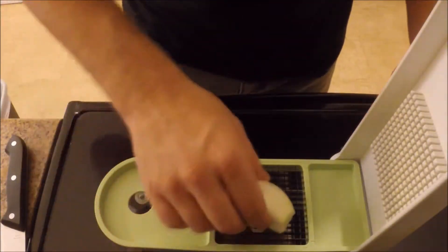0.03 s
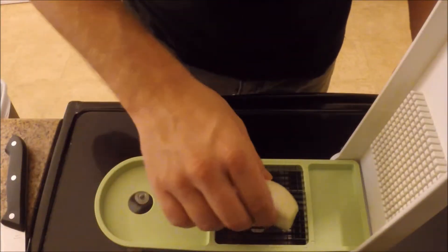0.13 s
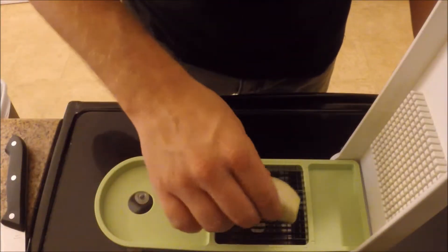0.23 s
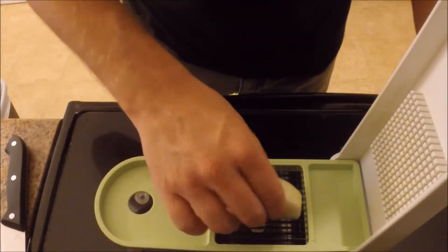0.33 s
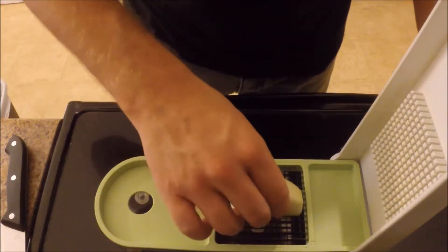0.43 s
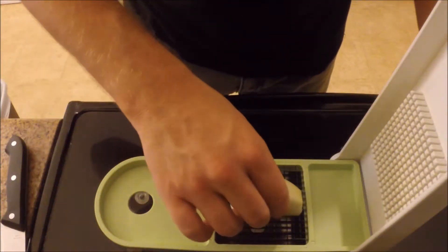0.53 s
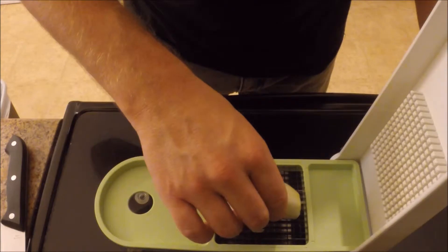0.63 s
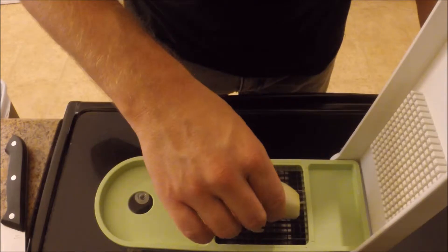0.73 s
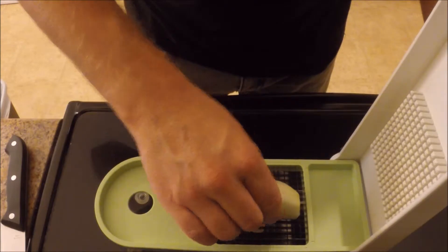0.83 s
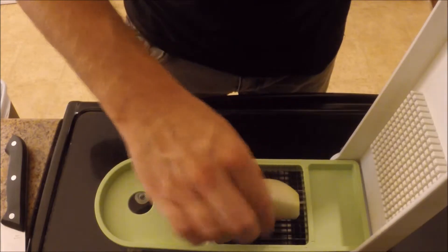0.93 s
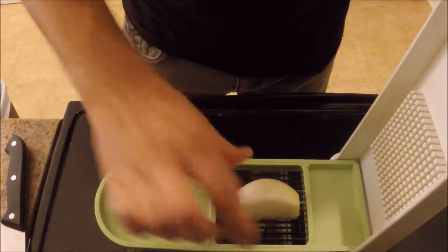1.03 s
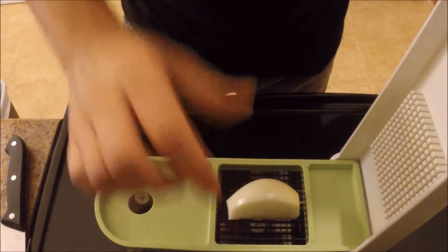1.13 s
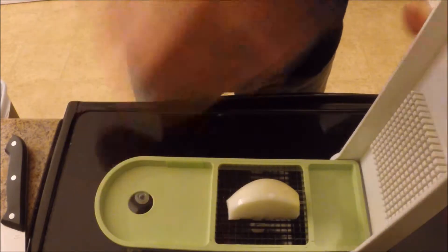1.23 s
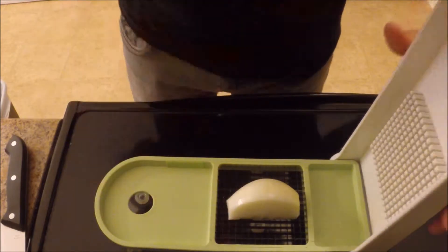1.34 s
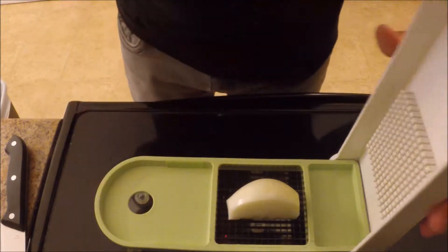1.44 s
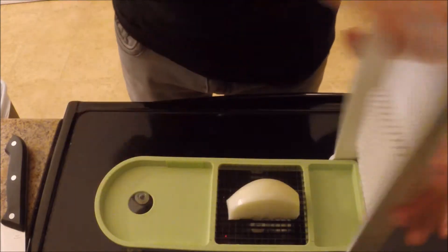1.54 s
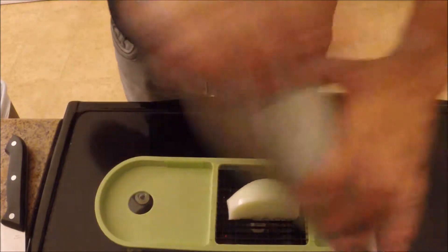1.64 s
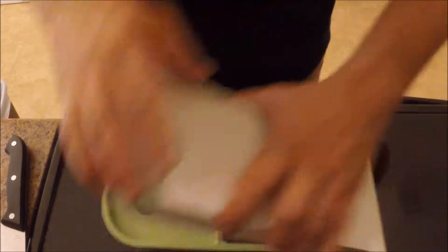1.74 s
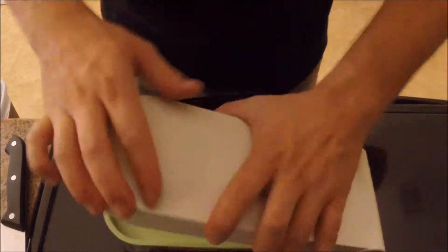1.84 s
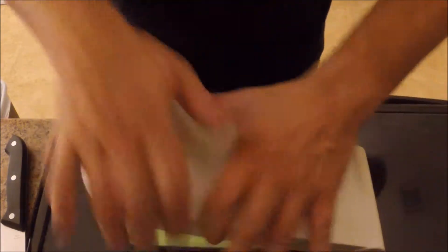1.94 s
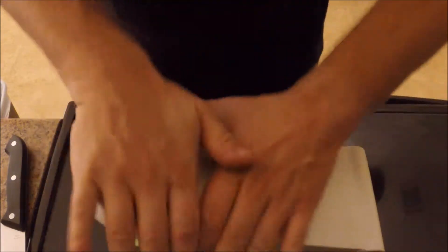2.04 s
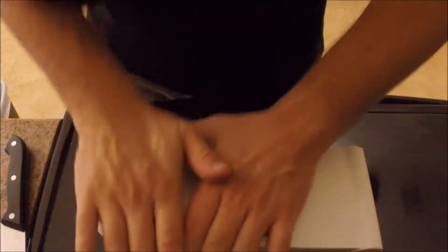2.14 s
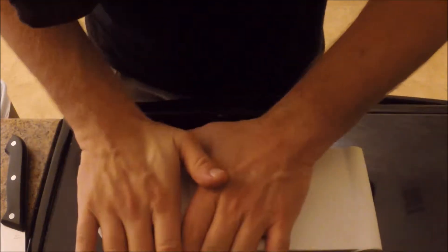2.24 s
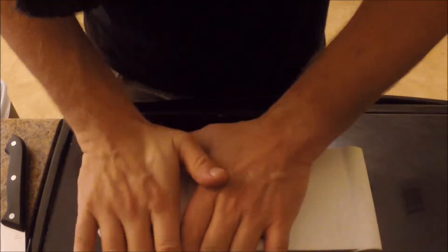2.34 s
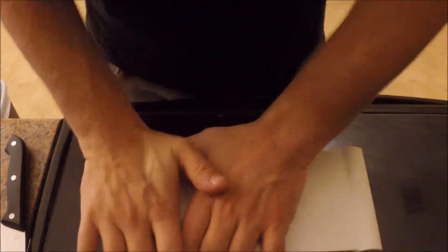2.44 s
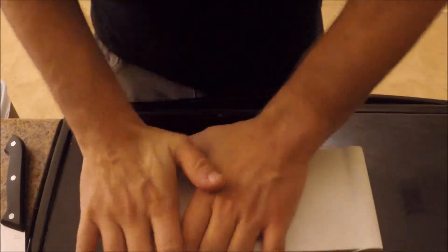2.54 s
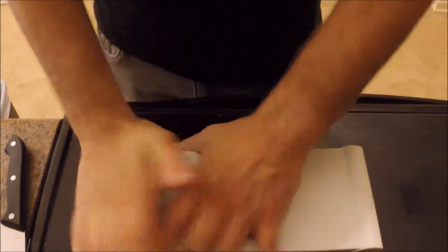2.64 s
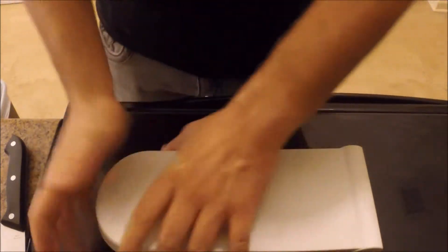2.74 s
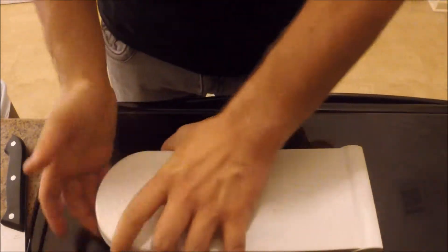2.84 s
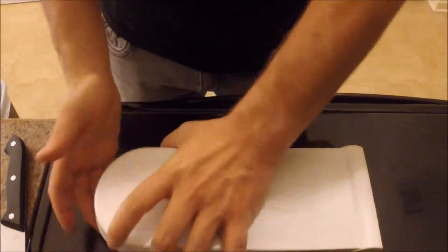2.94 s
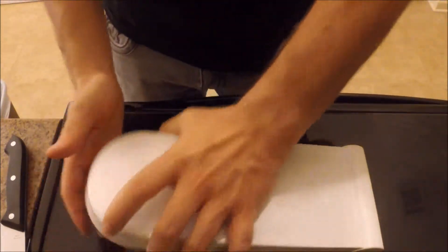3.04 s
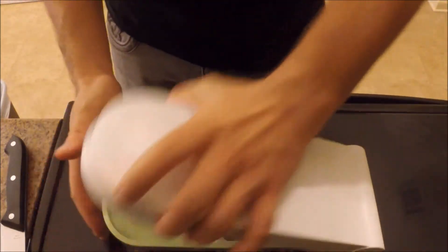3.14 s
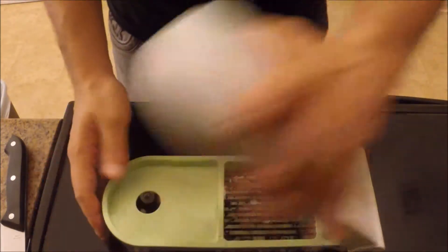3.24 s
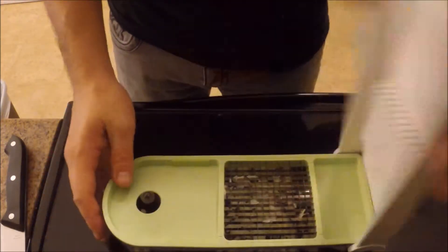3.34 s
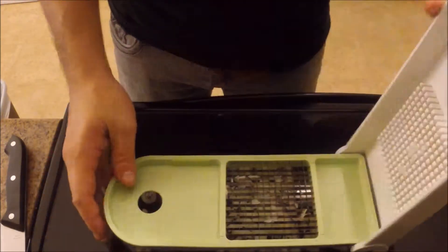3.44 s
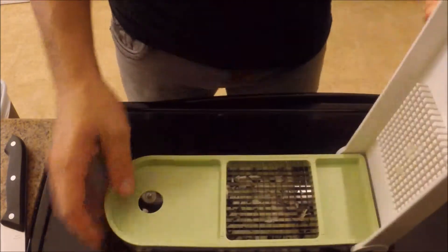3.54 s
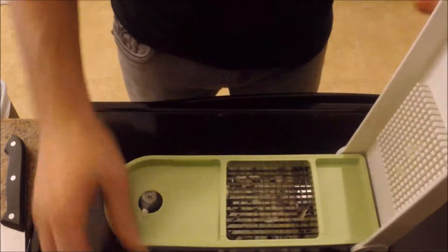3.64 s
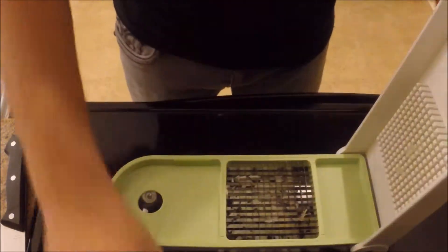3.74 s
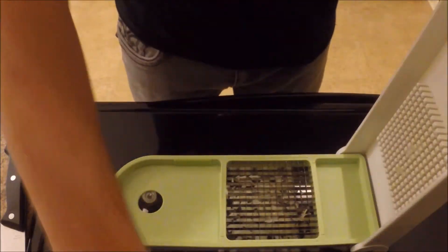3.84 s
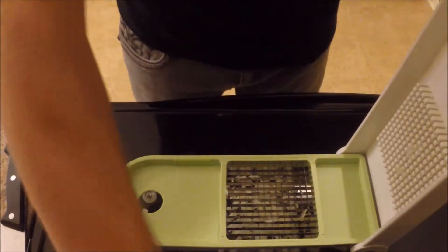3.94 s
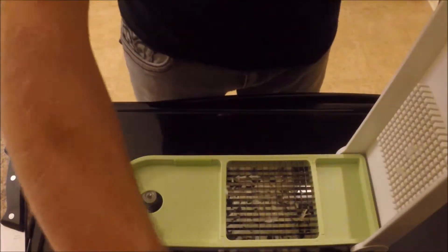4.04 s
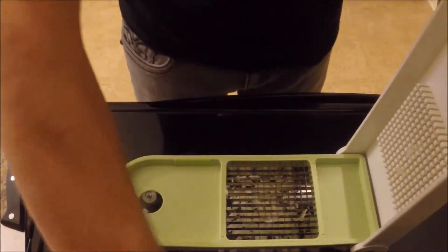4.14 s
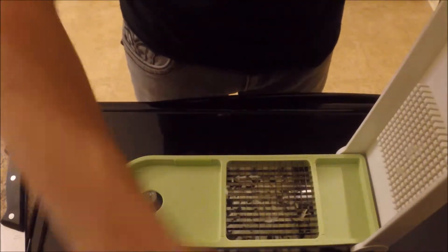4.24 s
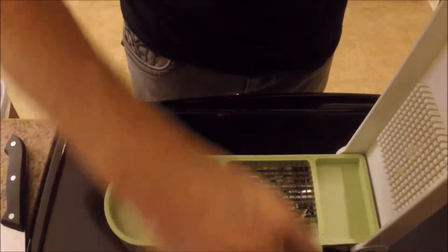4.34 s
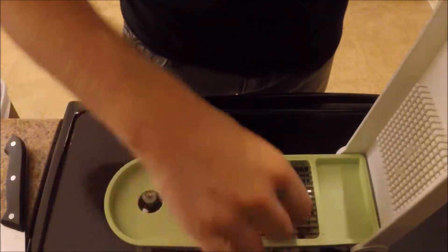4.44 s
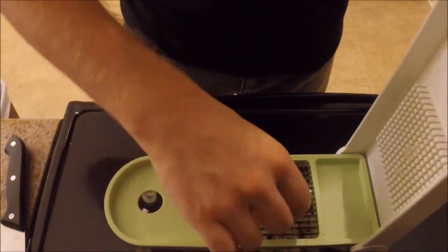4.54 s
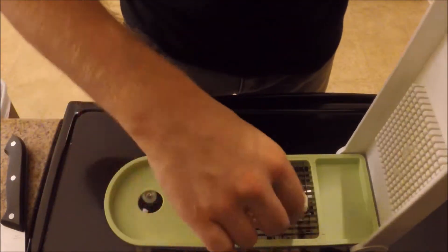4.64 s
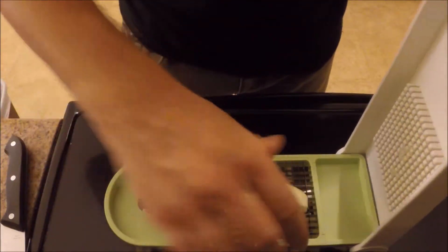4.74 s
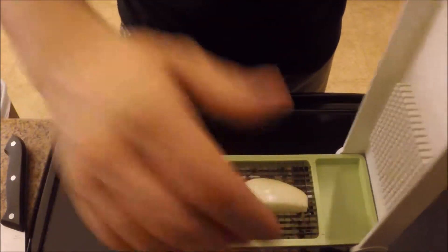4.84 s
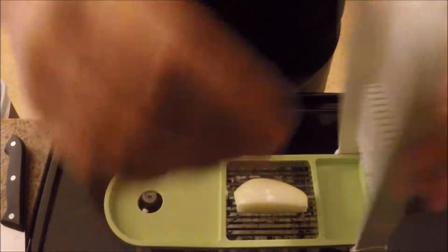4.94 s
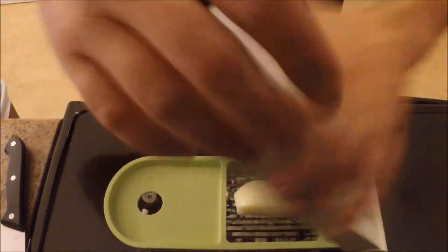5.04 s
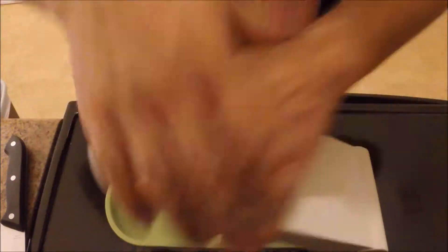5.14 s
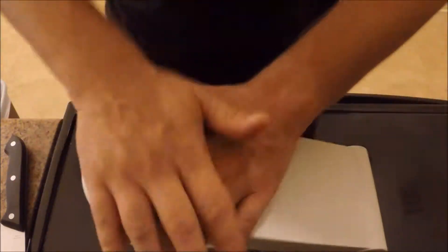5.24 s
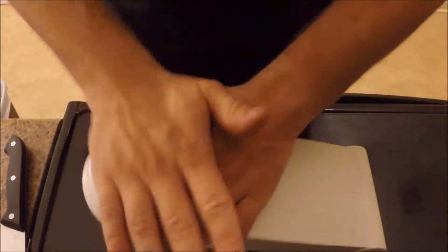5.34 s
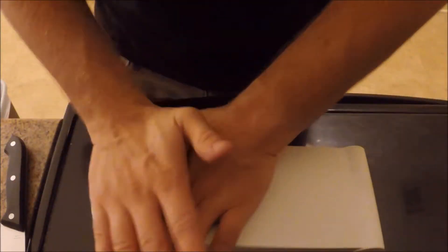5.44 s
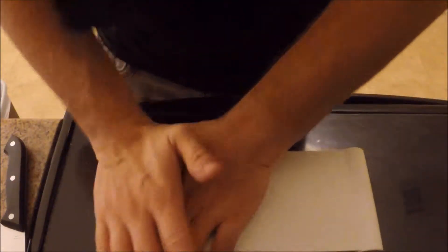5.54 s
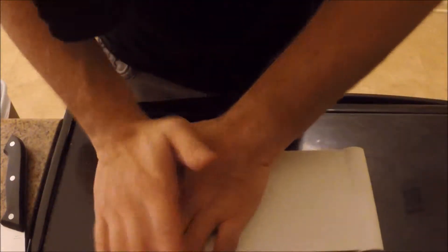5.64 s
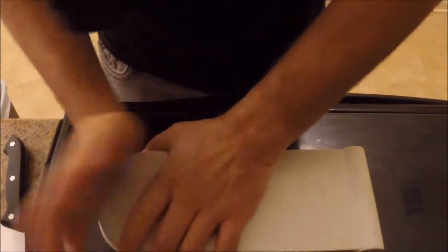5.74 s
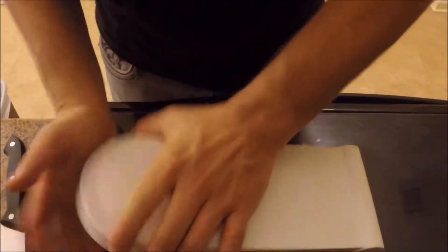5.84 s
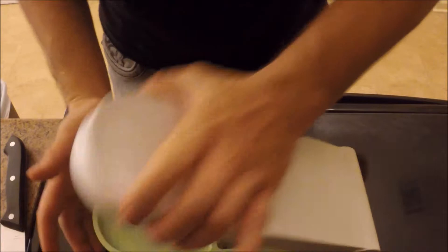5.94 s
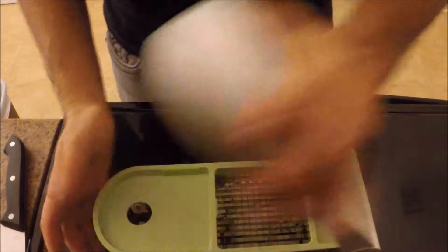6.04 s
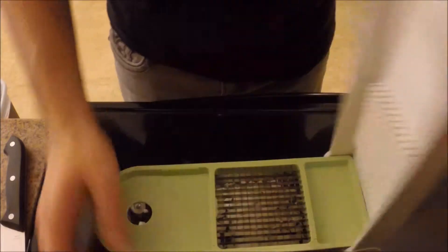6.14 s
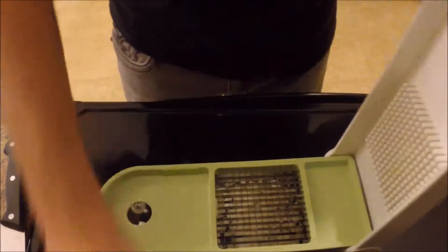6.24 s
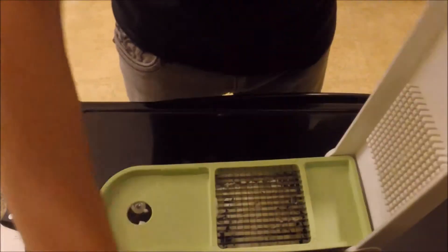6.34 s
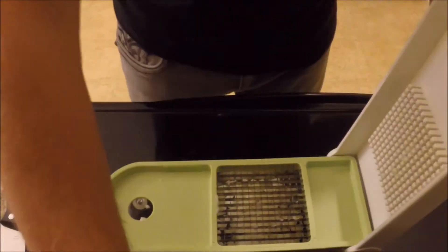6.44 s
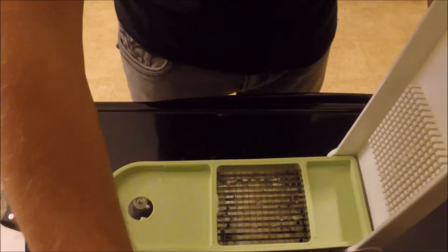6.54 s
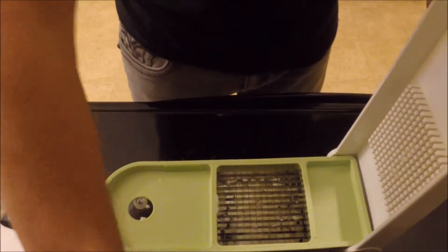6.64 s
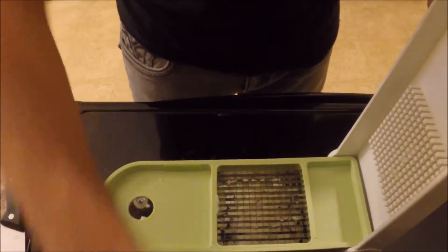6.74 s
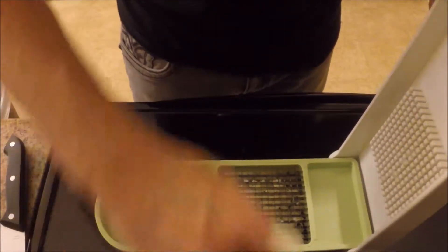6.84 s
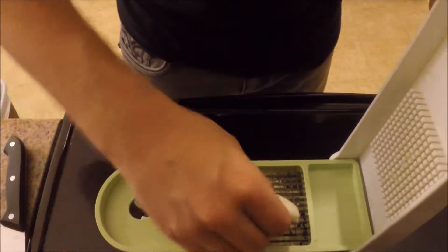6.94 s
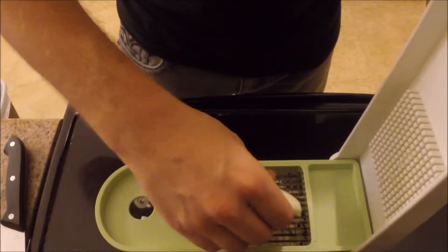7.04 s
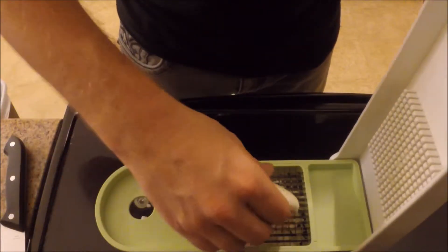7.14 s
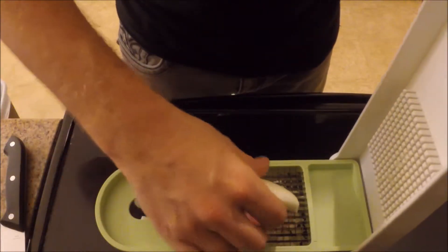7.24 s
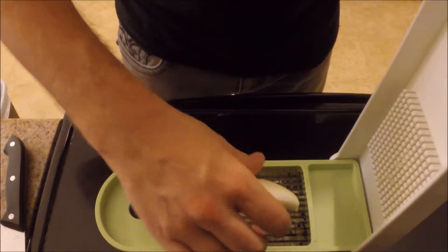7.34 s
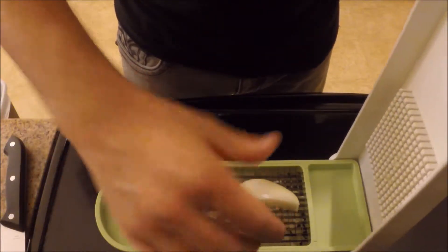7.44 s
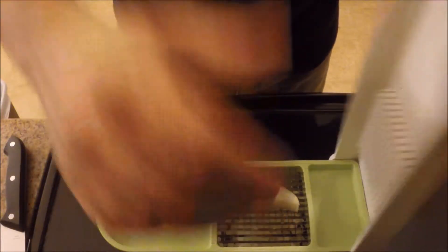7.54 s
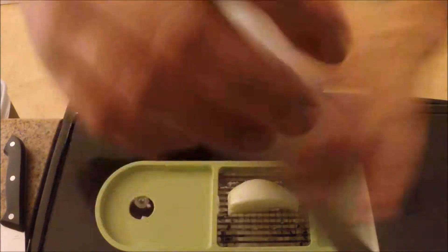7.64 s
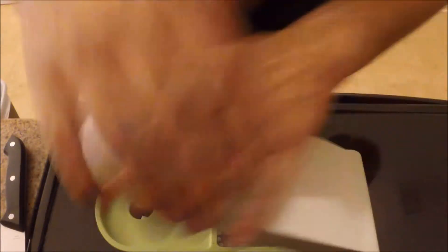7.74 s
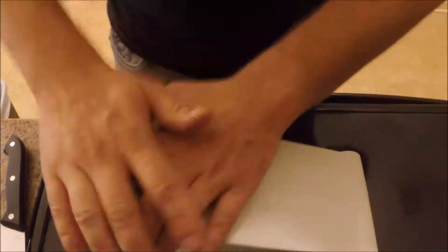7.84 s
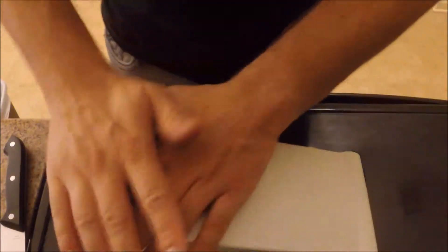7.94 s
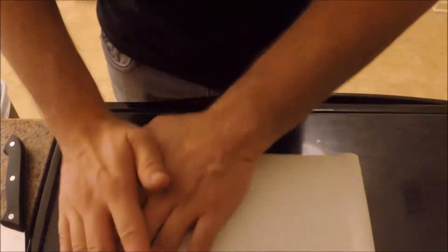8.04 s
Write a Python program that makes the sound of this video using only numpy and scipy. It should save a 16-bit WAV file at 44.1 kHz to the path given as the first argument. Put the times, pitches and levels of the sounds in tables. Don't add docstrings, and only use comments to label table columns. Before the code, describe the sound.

Plastic kitchen chopper taps and clicks, onion crunches through the blades, and the lid slams down hard twice with a low hob boom.

```python
import sys
import numpy as np
from scipy import signal
from scipy.fft import rfft, irfft
from scipy.io import wavfile
from scipy.ndimage import uniform_filter1d

SR = 44100
rng = np.random.default_rng(int(sys.argv[2]) if len(sys.argv) > 2 else 0)


def elevation(decibels):
    levels = np.asarray(decibels, float)
    return 10 ** (levels / 20)


def put_to_file(sound):
    columns = np.atleast_2d(sound).T
    safe = np.clip(columns, -1, 1)
    whole_steps = np.round(safe * 32767)
    wavfile.write(sys.argv[1], SR, whole_steps.astype(np.int16))


N = 357210
T = np.arange(N) / SR
SPAN = 4096

# pitch_hz, level_db (per Hz)
AIR = [(15, -9.5), (30, 1), (150, -1.5), (300, -7.5), (700, -13), (2000, -19.5), (4500, -26), (6500, -29.5),
       (8000, -33), (9800, -35.5), (10800, -31.5), (12000, -38), (15200, -39.5), (15600, -60)]
# start_s, length_s, pitch_hz, level_db
SQUEAKS = [
    (0.05, .075, 6600, -75),
    (0.808, .085, 6500, -73),
    (4.569, 0.075, 6550, -73.5),
]
# start_s, peak_db, low_part_db, high_part_db
TICKS = [(0.2714, -55.5, -2, -7), (1.7804, -43.5, -10, -40), (2.072, -47, -4, -14),
         (2.0925, -43, -5.5, -8.5), (2.143, -40.5, -23, -10), (2.174, -38, -11, -2),
         (2.3131, -33, -25, -23), (2.4473, -42.5, -44, -22), (2.4763, -44, -23.5, -9),
         (3.542, -44, -19.5, -5.5), (3.564, -45, 1.5, -3.5), (4.8338, -53.5, -13.5, -10.5),
         (5.0745, -50, 2, -13), (5.3204, -45.5, -9, -8), (5.9474, -49.5, -6, -15), (6.0696, -53, -1, -21),
         (6.1687, -40.5, -4.5, -14.5), (6.468, -56.5, -1, -23.5), (6.5132, -47, -6, -8),
         (6.706, -55.5, -4, -22), (7.5881, -53, 2, -25), (7.732, -44, -15, -28)]
# start_s, peak_db, low_part_db, high_part_db
KNOCKS = [(1.5572, -40, -1, -8.5), (1.6056, -38, -6, -14.5), (1.6494, -56, -2, -7),
          (1.8662, -24, -9, -12.5), (2.029, -45, -21, -14), (3.106, -55, -9, -10),
          (3.2162, -52.5, 1, -17.5), (3.3504, -57, 3, -2), (3.4397, -38.5, -3.5, -10.5),
          (3.4644, -46.5, 0, -21), (3.494, -49, 0, -4), (5.0858, -36, -6.5, -10.5),
          (5.1287, -47.5, 2, -28.5), (5.251, -46, -0.5, -16), (5.2923, -28.5, -6, -14),
          (6.2659, -42.5, -3.5, -12.5), (6.3011, -48, 0, -12), (6.3829, -54.5, 1, -6),
          (7.7508, -35.5, -4, -13), (7.7797, -43.5, -2, -24)]
# start_s, peak_db, low_part_db, rattle_ms
THUDS = [
    (2.5258, -28, 5.5, 2.9),
    (3.58, -62, 16.5, 4.6),
    (5.492, -39, 13, 3),
    (5.507, -23.5, 5, 0.68),
    (5.521, -27, 4.5, 2.5),
    (5.538, -37, 10.5, 3.5),
    (5.589, -29, 2.5, 6.8),
    (8.093, -30.5, 1, 3.7),
]
# start_s, peak_db, high_part_db, rattle_ms
SLAMS = [
    (2.5298, -6.5, -5, 6.7),
    (5.6202, -9, -5.5, 8.3),
]
# pitch_hz, width_hz, level_db
BODY = [(298, 27, -2), (386, 23, -0.5), (407, 71, -7.5), (500, 30, -5.5), (545, 24, -6.5), (642, 42, -7),
        (818, 69, -8.5), (954, 50, -7), (1237, 96, -4.5), (1370, 45, 1.5), (1480, 92, 1.5), (1631, 84, 3),
        (1825, 70, -0.5), (2047, 120, -3.5), (2416, 100, -4.5), (2885, 250, -9), (3392, 200, -5),
        (3650, 120, -2.5), (3927, 63, -5.5), (4200, 140, -8), (5030, 560, -14.5), (5574, 150, -6.5),
        (6030, 250, -10), (7090, 320, -10), (8656, 700, -18), (11000, 1600, -22.5), (13100, 3500, -32)]
# pitch_hz, fade_s (time to fall 60 dB), level_db
ROOM = [(287, 0.36, -15), (900, 0.29, -9.5), (2180, 0.62, -15.5), (4640, 0.57, -19), (11080, 0.25, -17)]
# start_s, level_db
CRICKET = [(0.4094, -74), (0.8794, -70), (1.5294, -72), (1.7294, -68), (2.9682, -74), (3.08, -67),
           (3.3515, -74), (3.6287, -67), (3.7887, -71), (3.9194, -70.5), (4.0594, -71), (4.2297, -71.5),
           (4.3388, -72.5), (5.1292, -76), (6.0494, -75.5), (6.1704, -75), (6.2894, -69), (6.4176, -67),
           (6.556, -66), (6.7328, -67), (6.834, -69.5), (7.039, -68), (7.121, -66.5), (7.3028, -72),
           (7.4586, -70.5), (7.5594, -69.5), (7.8294, -68)]
# start_s, plate_db, frame_db, worktop_db, plate_fade_s (short under a resting hand)
SHOVES = [(1.6, -55.5, -52, -47, 1.4), (1.88, -41.5, -62, -49.5, 0.72), (1.97, -36, -41, -53, 0.095),
          (2.24, -36.5, -55.5, -39, 0.67), (2.35, -43, -63.5, -59.5, 0.36), (2.54, -34.5, -45, -37, 1),
          (2.62, -30.5, -38, -35, 0.63), (2.88, -49.5, -43.5, -52, 2.85), (3.36, -62, -51.5, -52, .9),
          (3.521, -49, -50, -66, 1.03), (4.06, -63, -65.5, -62.5, .2), (5.12, -55.5, -67.5, -51, .6),
          (5.33, -46.5, -64.5, -59, 0.54), (5.4, -58, -51, -80, .2), (5.5, -32, -41, -34.5, 0.76),
          (5.61, -29.5, -41, -35.5, .6), (5.72, -34.5, -34, -38.5, 1.38), (6.14, -70, -49, -54, 0.94),
          (6.33, -47.5, -44, -60, 0.28), (6.53, -61, -55, -68, 0.78), (7.6, -58, -59, -65.5, .4),
          (7.794, -50, -62, -51, 1.4), (8.0, -44, -55, -57, 0.39), (8.09, -59, -47, -45, .6)]
# pitch_hz, width_hz, level_db
PLATE = [(155.2, 9.7, 1.5), (182.5, 40, -4.5)]
# pitch_hz, width_hz, level_db
FRAME = [(31.5, 1.5, 0)]
# pitch_hz, peak_db, fade_s (time to fall 60 dB), swell_s
CASING = [(50.5, -38.5, .7, 0.035), (95.7, -44.5, 3.8, 0.14), (107.9, -27, 0.31, 0.015),
          (217.2, -33, 0.24, 0.0052), (302, -28, 0.067, 0.0028)]
# start_s (full force), held_s, level_db, low_part_db, high_part_db
TEARS = [(2.092, 0.011, -46, -14.5, -13), (2.183, .07, -40, -5.5, -7.5), (2.27, 0.059, -40.5, -17, -10.5),
         (2.37, 0.055, -53.5, -11, -6), (2.46, 0.1, -49.5, -13.5, -4), (3.159, .06, -65, -2.5, -10.5),
         (3.351, .012, -60.5, -12, -7), (3.449, 0.023, -55, -12, -21), (5.33, 0.036, -49.5, -13.5, -13.5),
         (5.483, .045, -34.5, -14.5, -11), (5.593, 0.028, -34, -7, -9), (7.915, 0.068, -50.5, -10, -8),
         (8.045, .015, -53, -18, -3), (8.07, 0.024, -40.5, -18, -9.5)]
# centre_s, depth_db, length_ms
LOST = [(0.606, -12, 29), (.816, -16, 20), (1.225, -10, 19), (1.669, -10, 28), (1.789, -34, 45),
        (2.312, -12, 19), (2.419, -12, 21), (2.717, -5, 15), (3.464, -13, 17), (4.81, -17, 17.6),
        (4.915, -10, 22), (5.128, -8.5, 8.3), (5.257, -18.5, 23), (5.36, -19, 24), (5.552, -26, 21),
        (5.659, -12, 27), (5.79, -22, 16.6), (5.918, -21, 20), (6.151, -4.5, 15), (6.364, -18, 16.5),
        (6.707, -23.5, 19), (7.141, -15.5, 27), (7.24, -22, 17.5), (7.922, -24, 23), (8.014, -4, 11)]


def unit(x):
    return x / np.sqrt(np.mean(x ** 2))


def shape(x, gain):
    hz = np.arange(len(x) // 2 + 1) * SR / len(x) + 0.0011
    return irfft(rfft(x) * gain(hz), len(x))


def band(x, lo_hz, hi_hz):
    return signal.sosfilt(signal.butter(3, [lo_hz, hi_hz], "band", fs=SR, output="sos"), x)


def ring(hz, modes, extra_db, spread=1.):
    total = 0
    for k, ((f, width, db), extra) in enumerate(zip(modes, extra_db)):
        loss = 1j * hz * width * spread
        total = total + (-1) ** k * elevation(db + extra) * loss / (f * f - hz * hz + loss)
    return total


def slices(hz, edges_hz):
    above = np.array([1 - 1 / (1 + (hz / edge) ** 7) for edge in edges_hz])
    return above[:-1] - above[1:]


def swells(starts, held, levels_db, rise_db_s, fall_db_s):
    power = np.zeros(N // 64 + 2)
    t = np.arange(len(power)) * 64 / SR
    for s, hold, db, fall in np.broadcast(starts, held, levels_db, fall_db_s):
        climb = rise_db_s * np.maximum(s - t, 0)
        fade = fall * np.maximum(t - s - hold, 0)
        power += elevation(db - climb - fade) ** 2
    return np.interp(T, t, np.sqrt(power))


def air():
    hz, db = np.transpose(AIR)
    hiss = shape(rng.standard_normal(N), lambda f: elevation(np.interp(np.log(f), np.log(hz), db)))
    return unit(hiss) * elevation(-57.5)


def squeaks():
    out = np.zeros(N)
    for s, length, hz, db in SQUEAKS:
        t = T[:int(length * SR)]
        phase = 2 * np.pi * hz * (t + 0.081 * t * t)
        edge = np.clip(np.minimum(t, length - t) / 0.0045, 0, 1)
        out[int(s * SR):][:len(t)] = elevation(db) * edge * (np.sin(phase) + elevation(-5.0) * np.sin(2 * phase))
    return out


def blows(rows, low_hz, split_hz, scatter_db, spread, hold):
    out = np.zeros((2, N + SPAN))
    t, hz = T[:SPAN], np.arange(SPAN // 2 + 1) * SR / SPAN
    parts = slices(hz, (low_hz, split_hz, 3000, 5000, 17000))
    blurs = irfft(parts * ring(hz, BODY, np.zeros(len(BODY)), 4.0))
    for s, db, low_db, mid_db, top_db, ms in rows:
        noise, chance = rng.standard_normal((2, SPAN))
        uneven = elevation(10.0 * uniform_filter1d(chance, size=40))
        contacts = noise * uneven * (1 - np.exp(-t / 0.00026))
        length_s = max(ms, .5) / 1000 * np.array([[1.1], [1], [.8], [.65]])
        rattle = contacts * np.exp(-(t / length_s) ** hold)
        tones = ring(hz, BODY, scatter_db * chance[:len(BODY)], spread)
        hits = irfft(rfft(rattle) * tones * parts)
        part_db = np.array([low_db - 0.5, 0, mid_db + 2.0, top_db + 6.5])
        hits = hits * (elevation(db + part_db) / np.abs(hits).max(axis=1))[:, None]
        energy = np.sqrt(np.sum(hits ** 2, axis=1) / np.sum(blurs ** 2, axis=1))
        out[:, int(s * SR):][:, :SPAN] += [hits.sum(axis=0), energy @ blurs]
    return out[:, :N]


def taps():
    rows = [(*row, row[-1] - 6, 12) for row in TICKS]
    rows += [(*row, row[-1] - 14, 8.7) for row in KNOCKS]
    return blows(sorted(rows), 520, 1000, 3.0, 1.0, 0.81)


def cricket():
    starts = np.zeros(N)
    for s, db in CRICKET:
        starts[int((s + .02) * SR)] = elevation(db - 7.5)
    gate = uniform_filter1d(uniform_filter1d(starts, size=1600) * 1600, size=300)
    noise = rng.standard_normal(N)
    return gate * (unit(band(noise, 7280, 7420)) + elevation(-6.0) * unit(band(noise, 8700, 9200)))


def hob():
    push = rng.standard_normal((3, N))
    at, plate_db, frame_db, worktop_db, plate_fade = np.transpose(SHOVES)

    def shoved(db, fade_s):
        return swells(at, 0, db, 260, 60 / np.maximum(fade_s, .05))

    plate = unit(shape(push[0], lambda f: ring(f, PLATE, [0, 0]) ** 2))
    frame = unit(shape(push[1], lambda f: ring(f, FRAME, [0])))
    worktop = unit(band(push[2], 60, 140.0))
    out = plate * shoved(plate_db - 3.0, plate_fade)
    out = out + frame * shoved(frame_db - 3.0, 1)
    out = out + worktop * shoved(worktop_db - 4.5, 0.51)
    t = T[:2 * SR]
    boom = 0
    for hz, db, fade_s, swell_s in CASING:
        loudness = elevation(db - 60 * t / fade_s) * (1 - np.exp(-t / swell_s))
        boom = boom + loudness * np.sin(2 * np.pi * hz * t)
    for s, *_ in SLAMS:
        out[int((s - .004) * SR):][:2 * SR] += boom * np.clip(10 - 5 * t, 0, 1)
    return out


def onion():
    cracks = rng.standard_normal(N) * (rng.random(N) < .1) * elevation(1.9 * rng.exponential(size=N))
    cracks = cracks * elevation(1.1 * unit(band(rng.standard_normal(N), 30, 110)))
    hz = np.arange(SPAN // 2 + 1) * SR / SPAN
    body = ring(hz, BODY, np.zeros(len(BODY)), 1.6)
    voices = irfft(slices(hz, (280, 750, 3000, 16000)) * body)
    voices = np.roll(voices, shift=SPAN // 32, axis=1)
    s, held, level, low, high = np.transpose(TEARS)
    out = 0
    for voice, db in zip(voices, (level + low + 0.97, level - 1.5, level + high + 1.14)):
        crunch = unit(signal.oaconvolve(cracks, voice)[:N])
        out = out + crunch * swells(s, held, db, 622, 361)
    return out


def thuds():
    rows = [(s, db, low_db, -8, -19, ms) for s, db, low_db, ms in THUDS]  # high, top part in dB
    return blows(rows, 220, 480, 2.378, 1.4, 2.1)


def slams():
    rows = [(s, db, -18.5, high, high - 2.5, ms) for s, db, high, ms in SLAMS]
    return blows(rows, 260, 1000, 1.5, 2.2, 1.3)


def kitchen(x):
    t, tail = T[:SR], 0
    for hz, fade_s, db in ROOM:
        echo = band(rng.standard_normal(SR), hz / 1.65, min(hz * 1.396, 17000))
        echo = echo * elevation(-60 * t / fade_s) * np.clip(t / 0.0022, 0, 1)
        width = min(hz * 1.7 / (SR / 2), 1)
        tail = tail + elevation(db) * echo / np.sqrt(np.sum(echo ** 2) / width)
    return signal.fftconvolve(x, tail)[:N]


def scene():
    near, walls = taps() + thuds() + slams() + onion()
    return (near + elevation(4.0) * kitchen(walls) + hob() + cricket() + squeaks() + air())[None]


def starve(x):
    low_hz, high_hz = 12600, 15290
    hz, t, bins = signal.stft(x, SR, nperseg=1024)
    luck = rng.random((len(hz) // 4 + 1, len(t) // 3 + 1))
    luck = np.repeat(np.repeat(luck, 4, axis=0), 3, axis=1)[:len(hz), :len(t)]
    share = .45 * np.clip((hz - low_hz) / (high_hz - low_hz) + .2, 0, 1) * (hz > low_hz)
    holes = np.where(luck < share[:, None], elevation(-17.5), 1)
    return signal.istft(bins * holes, SR, nperseg=1024)[1][:N]


def conceal(x, count=9):
    out = x.copy()
    window = np.hanning(2048)
    for s, db, ms in LOST:
        a = int(s * SR) - 1024
        piece = x[a:a + 2048]
        bins = rfft(piece * window)
        tops = signal.argrelmax(np.abs(bins), order=8)[0]
        keep = np.arange(len(bins)) < 40
        for k in tops[np.argsort(np.abs(bins[tops]))[-count:]]:
            keep[k - 2:k + 3] = True
        rest = piece - irfft(bins * keep) / np.maximum(window, .25)
        dip = np.clip((ms / 2000 + .001 - np.abs(T[a:a + 2048] - s)) / .009, 0, 1)
        out[a:a + 2048] -= rest * (1 - elevation(db)) * np.sin(dip * np.pi / 2) ** 2
    return out


def top_cut(x):
    return signal.sosfilt(signal.butter(12, 16440, fs=SR, output="sos"), x)


def record(dry):
    overloaded = np.tanh(1.1 * dry[0]) / np.tanh(1.1)
    heard = shape(overloaded, lambda f: elevation(-24.0) + .93 / (1 + (f / 15350) ** 90))
    starved = sum(np.clip(np.minimum(T - s - .1, s + 0.51 - T) / 0.066, 0, 1) for s, *_ in SLAMS)
    heard = heard - starved * shape(heard, lambda f: 1 - 1 / (1 + (f / 12800) ** 16))
    return top_cut(conceal(starve(heard))[None])


dry = scene()
out = record(dry)
put_to_file(out)
```